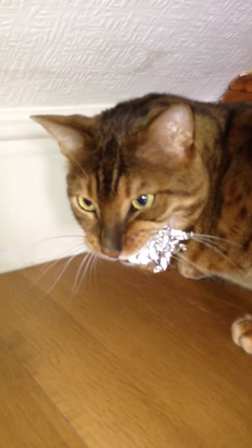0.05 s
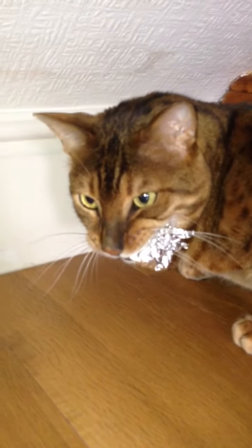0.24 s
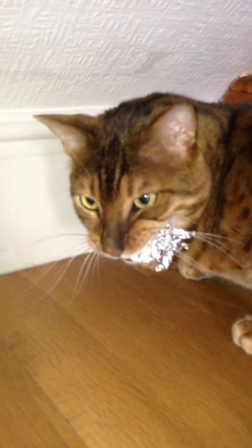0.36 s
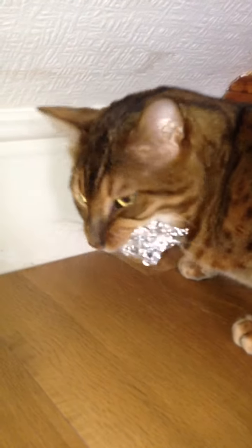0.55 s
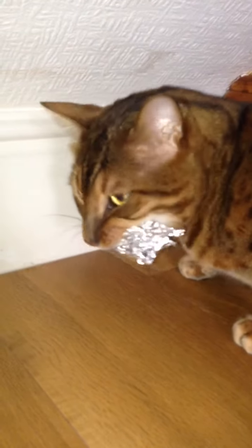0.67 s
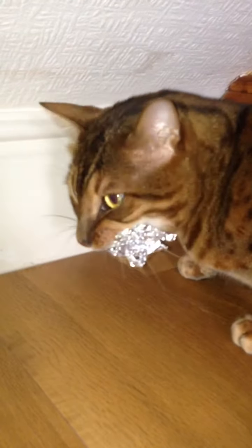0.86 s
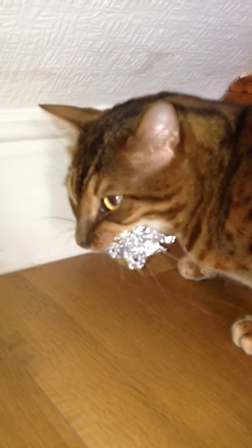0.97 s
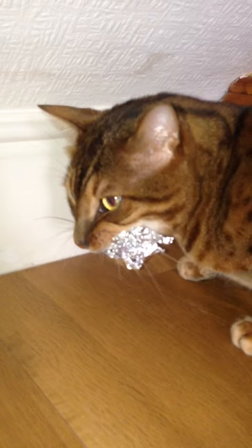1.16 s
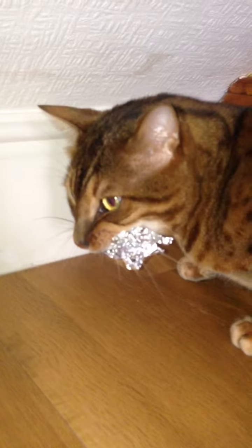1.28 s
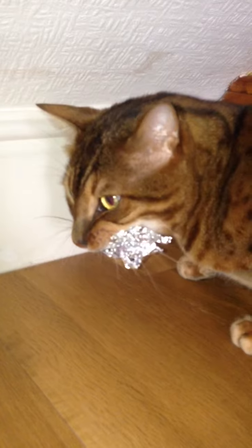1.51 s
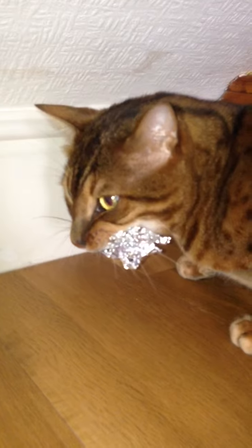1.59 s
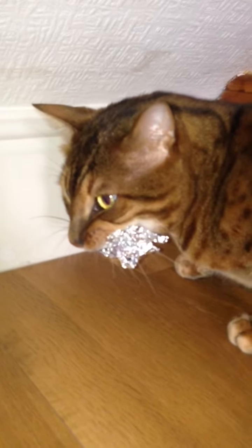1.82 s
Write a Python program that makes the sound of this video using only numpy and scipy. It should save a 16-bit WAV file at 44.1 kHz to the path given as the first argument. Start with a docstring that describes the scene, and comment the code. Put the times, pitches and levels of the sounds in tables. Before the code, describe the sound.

A cat growls through a shut mouth, close to the microphone. A soft gust of breath comes at about 0.2 seconds, and the low, rough growl starts right with it. It swells and rises slightly, loudest from 0.4 to 0.8 seconds, then sinks to a quieter, lower, throbbing rattle with faint nasal breath, lasting until about 1.85 seconds. The quiet room hisses faintly behind.

```python
"""A soft gust of breath, then a cat growls through its nose, close to the microphone in a quiet room.
Its mouth is shut on a ball of foil. Two parts of the larynx vibrate at different pitches, waver
together, and throb near a 4:7 ratio as the growl sinks from its swell to a low rattle.
Each cycle knocks the throat and lets a puff of air through the nose.
The nearby wall and floor answer briefly; the room hisses behind."""
import sys
import numpy as np
from scipy import signal
from scipy.fft import rfft, irfft, next_fast_len
from scipy.io import wavfile
from scipy.ndimage import map_coordinates

SR = 44100
rng = np.random.default_rng(int(sys.argv[2]) if len(sys.argv) > 2 else 0)


def output_pcm(signal):
    """Save a mono or channel-first signal as 16-bit PCM at the path in sys.argv[1].

    Samples are clipped to [-1, 1] before scaling.
    """
    pcm = np.clip(np.atleast_2d(signal).T, -1, 1) * 32767
    wavfile.write(sys.argv[1], SR, np.round(pcm).astype(np.int16))


N = 81585
JITTER, JITTER_HZ = .011, 55  # the larynx wavers: share of its pitch, changes a second


def amp(db):
    """Decibels to gain."""
    return 10 ** (np.asarray(db) / 20)


def unit(x):
    """x at rms 1."""
    return x / np.sqrt(np.mean(x ** 2) + 1e-20)


def curves(rows):
    """One value per sample for each column after the time."""
    time_s, *columns = np.transpose(rows)
    return [np.interp(np.arange(N) / SR, time_s, column) for column in columns]


def level(rows):
    """Gain per sample from rows of time_s, level_db."""
    return amp(curves(rows)[0])


def wobble():
    """A smooth random curve: the unsteadiness of the larynx."""
    return map_coordinates(rng.standard_normal(N), [np.arange(N) * JITTER_HZ / SR], order=3)


def filtered(x, response):
    """x times a complex response of frequency."""
    size = 2 * next_fast_len(N)
    return irfft(rfft(x, size) * response(np.fft.rfftfreq(size, 1 / SR)), size)[:N]


def coloured(x, spectrum):
    """x through a causal filter shaped by rows of freq_hz, gain_db, at rms 1."""
    freq_hz, gain_db = np.transpose(spectrum)

    def response(hz):
        gain = amp(np.interp(np.log(hz + 1), np.log(freq_hz), gain_db))
        cepstrum = irfft(np.log(gain))
        half = len(cepstrum) // 2
        cepstrum[1:half] *= 2  # fold to minimum phase
        cepstrum[half + 1:] = 0
        return np.exp(rfft(cepstrum))
    return unit(filtered(x, response))


def noise(spectrum):
    """Coloured noise at rms 1."""
    return coloured(rng.standard_normal(N), spectrum)


def resonant(x, peaks):
    """x through parallel resonances of alternating sign, at rms 1."""
    def response(hz):
        return sum((-1) ** k * amp(db) * 1j * hz * width / (centre ** 2 - hz ** 2 + 1j * hz * width)
                   for k, (centre, width, db) in enumerate(peaks))
    return unit(filtered(x, response))


# The quiet room behind the cat: freq_hz, gain_db
ROOM_SPECTRUM = [(25, -15), (50, -6), (95, 6), (200, 0.5), (400, -6.5), (700, -6.5), (1200, -7),
                 (2600, -6.5), (3500, -9), (8000, -11), (15000, -11)]


def room_hiss(level_db=-66):
    """The steady hiss of the room."""
    return amp(level_db) * noise(ROOM_SPECTRUM)


def corner(x, t60_s=0.11, level_db=-9):
    """x with the short, dense answer of wall and floor."""
    t = np.arange(SR // 4) / SR
    tail = rng.standard_normal(len(t)) * amp(-60 * t / t60_s)
    return x + amp(level_db) * signal.fftconvolve(x, tail / np.linalg.norm(tail))[:N]


# Breath close to the microphone: time_s, level_db
BREATH_LEVEL = [(.5, -76), (.9, -77.5), (1.2, -71.5), (1.35, -68), (1.6, -67), (1.72, -74), (1.85, -69)]
# Its colour: freq_hz, gain_db
BREATH_SPECTRUM = [(500, -16), (900, -14), (1500, 5), (2200, -3.5), (2900, -6.5), (4500, -3.5), (7000, -5),
                   (10000, -11.5), (15000, -19)]


def breath():
    """Air hisses from the nose, strongest as the growl sinks."""
    return level(BREATH_LEVEL) * noise(BREATH_SPECTRUM)


# The opening gust, close by: time_s, level_db
FIRST_GUST_LEVEL = [(.09, -97), (.2, -60.5), (.26, -62), (.36, -62), (.46, -73.5), (.7, -71), (.9, -97)]
# Its colour: freq_hz, gain_db
GUST_SPECTRUM = [(400, -12), (620, 4.5), (850, 7), (1500, 1.5), (2200, 2), (3200, -1.5), (4500, -2.5),
                 (7000, -5.5), (10000, -10), (15000, -24)]


def first_gust():
    """Air rushes through the nose just ahead of the voice and fades under it."""
    return level(FIRST_GUST_LEVEL) * noise(GUST_SPECTRUM)


# The nose at close range (rasp, bright ring, nostril sizzle, thin high edge): time_s, level_db
NOSE_RASP_LEVEL = [(.13, -111), (.23, -67.5), (.32, -68), (.4, -61.5), (.48, -63.5), (.54, -62),
                   (.62, -61.5), (.7, -64.5), (.76, -61.5), (.86, -64.5), (1.02, -67), (1.2, -66.5),
                   (1.5, -69), (1.85, -69)]
NOSE_RING_LEVEL = [(.15, -85), (.24, -67), (.29, -61.5), (.34, -67.5), (.39, -60), (.43, -60), (.51, -63),
                   (.58, -63), (.66, -67.5), (.8, -72), (1.1, -78), (1.85, -84)]
NOSTRIL_LEVEL = [(.2, -97), (.5, -78), (.6, -85), (.68, -72), (.85, -71.5), (1.05, -73), (1.5, -76),
                 (1.85, -74)]
HIGH_EDGE_LEVEL = [(.45, -95), (.57, -81), (.65, -79), (.78, -81), (1, -84), (1.3, -92)]
# Colour of the rasp: freq_hz, gain_db
RASP_SPECTRUM = [(300, -27), (550, -14.5), (640, -7.5), (780, -12.5), (920, -6.5), (1080, 1.5), (1220, -3),
                 (1500, -4.5), (1800, -22.5), (2230, -4), (2900, -24), (5000, -39.5), (12000, -31.5)]
# Resonances of ring, sizzle and edge: centre_hz, width_hz, gain_db
RING_PEAKS = [(2450, 205, 6), (2672, 210, -5)]
NOSTRIL_PEAKS = [(3330, 215, -4), (7000, 500, -18)]
EDGE_PEAKS = [(6000, 250, -2), (7400, 340, -5)]


def nose(pulses, puff_decay_s=0.0041, steady_leak=0.57, click_db=-12.5):
    """Each closure clicks and lets a puff of air through the nasal resonances."""
    puffs = unit(signal.lfilter([1], [1, -np.exp(-1 / (puff_decay_s * SR))], pulses))
    turbulence = unit((puffs + steady_leak) * rng.standard_normal(N))
    flow = turbulence + amp(click_db) * unit(pulses)
    rasp = level(NOSE_RASP_LEVEL) * coloured(flow, RASP_SPECTRUM)
    ring = level(NOSE_RING_LEVEL) * resonant(flow, RING_PEAKS)
    sizzle = level(NOSTRIL_LEVEL) * resonant(flow, NOSTRIL_PEAKS)
    edge = level(HIGH_EDGE_LEVEL) * resonant(flow, EDGE_PEAKS)
    return rasp + ring + sizzle + edge


def closures(own, other, scatter_db, scatter_s=.00042, pull_s=.0005, coupling=0.17):
    """One pulse per cycle of a vibration; chance and the other vibration vary its time and size."""
    starts = np.flatnonzero(np.diff(np.floor(own)))
    chance = rng.standard_normal((N // 100, 2))[:len(starts)]
    other_phase = 2 * np.pi * other[starts]
    when = starts + SR * (pull_s * np.sin(other_phase) + scatter_s * chance[:, 0])
    size = (1 + coupling * np.cos(other_phase)) * amp(scatter_db * chance[:, 1])
    return np.bincount(np.clip(when, 0, N - 1).astype(int), size, N)


# Knocks in the throat, behind the shut mouth: time_s, level_db
KNOCK_LEVEL = [(.17, -87), (.185, -57), (.222, -66), (.235, -52.5), (.275, -51.5), (.305, -58.5),
               (.345, -48.5), (.42, -50.5), (.5, -50), (.63, -45.5), (.75, -53), (.87, -55), (1.03, -62),
               (1.2, -63.5), (1.5, -65), (1.68, -61.5), (1.85, -58)]
# Colour of the throat: freq_hz, gain_db
THROAT_SPECTRUM = [(30, -27.5), (60, -13.5), (85, -34), (120, -14.5), (160, 0.5), (190, -5), (220, -5),
                   (255, -4), (295, -0.5), (350, -1.5), (400, -5.5), (470, -10.5), (540, -28), (640, -17),
                   (780, -30.5), (1100, -27.5), (1800, -45.5), (5000, -84)]


def throat(slow, fast, fast_db=-1.5, scatter_db=2.3):
    """The closures of both vibrations knock the throat."""
    pulses = closures(slow, fast, scatter_db) + amp(fast_db) * closures(fast, slow, scatter_db)
    return level(KNOCK_LEVEL) * coloured(pulses, THROAT_SPECTRUM)


# Low flutter in the growl: time_s, level_db
LOW_FLUTTER_LEVEL = [(.17, -90), (.187, -56), (.22, -56), (.235, -45), (.28, -49), (.31, -41), (.34, -51.5),
                     (.42, -54.5), (.66, -44), (.9, -50.5), (1.3, -51), (1.85, -60.5)]
# Its colour: freq_hz, gain_db
FLUTTER_SPECTRUM = [(25, -15.5), (55, -11.5), (78, -3.5), (140, 5), (200, -14), (350, -15.5), (470, -17),
                    (600, -43), (2000, -59.5)]


def flutter():
    """Low, irregular noise roughens the voice."""
    return level(LOW_FLUTTER_LEVEL) * noise(FLUTTER_SPECTRUM)


def hum(cycles, gain, start_s=0.226, attack_s=0.013, shimmer_db=-0.5):
    """A slightly unsteady tone that sets in with the growl."""
    attack = np.clip((np.arange(N) / SR - start_s) / attack_s, 0, 1)
    shimmer = amp(shimmer_db * wobble())
    return np.sqrt(2) * attack * gain * shimmer * np.cos(2 * np.pi * cycles)


# Second harmonic, upper harmonics and combination tones: time_s, level_db
OCTAVE_LEVEL = [(.22, -81), (.34, -55), (.4, -48), (.5, -50), (.62, -57), (.72, -49.5), (.81, -50.5),
                (.95, -68), (1.05, -49.5), (1.5, -66), (1.85, -67)]
UPPER_LEVEL = [(.22, -69), (.3, -67), (.42, -60.5), (.54, -62.5), (.6, -57.5), (.635, -50), (.68, -55),
               (.74, -65), (.85, -80), (1.85, -85.5)]
COMBINATION_LEVEL = [(.22, -66), (.5, -79), (.7, -88), (.9, -57), (1.1, -63.5), (1.4, -56.5), (1.85, -58)]
# Pitch of each combination tone: slow_multiple, fast_multiple
COMBINATIONS = [(-1, 2), (1, 1), (4, -1)]
# Weight of each: gain_db
COMBINATION_DB = [-2.5, -11, -0.5]


def overtones(slow, fast, fourth_db=-2.5):
    """Harmonics of the slow vibration, and the tones that the two make together."""
    tones = hum(2 * slow, level(OCTAVE_LEVEL))
    tones += hum(3 * slow, level(UPPER_LEVEL))
    tones += hum(4 * slow, amp(fourth_db) * level(UPPER_LEVEL))
    for (slow_multiple, fast_multiple), db in zip(COMBINATIONS, COMBINATION_DB):
        tones += hum(slow_multiple * slow + fast_multiple * fast, amp(db) * level(COMBINATION_LEVEL))
    return tones


def vibration(rows, shared_jitter):
    """One vibrating part of the larynx: its count of cycles and its hum."""
    pitch_hz, level_db = curves(rows)
    cycles = np.cumsum(pitch_hz * (1 + shared_jitter + JITTER * wobble())) / SR
    return cycles, hum(cycles, amp(level_db))


# The two vibrating parts of the larynx, heard close by: time_s, pitch_hz, level_db
SLOW_VOICE = [(0.22, 87.68, -49), (0.232, 84.47, -47.5), (0.296, 80.9, -45.5), (0.36, 91.2, -43.5),
              (0.424, 93.27, -34.5), (0.514, 89.44, -43.5), (0.636, 97.72, -31.5), (0.71, 101.4, -37),
              (0.768, 95.7, -36), (0.85, 84.34, -54), (1.09, 76.87, -48), (1.246, 73.05, -45),
              (1.5, 73.77, -45.5), (1.65, 72.18, -57), (1.78, 73.1, -50.5), (1.85, 75.1, -53.5)]
FAST_VOICE = [(0.22, 133.4, -68), (0.228, 130.7, -49), (0.238, 134.4, -38.5), (0.314, 139.5, -51.5),
              (0.338, 144.9, -74), (0.406, 153.9, -59), (0.554, 153.8, -38.5), (0.618, 145.1, -58),
              (0.66, 143.8, -41.5), (0.822, 146.5, -37.5), (0.918, 143.6, -37.5), (1.096, 134.5, -52.5),
              (1.35, 130.8, -49.5), (1.844, 128, -58), (1.85, 129.2, -58)]
# Throb as every fourth slow cycle comes stronger: time_s, depth_fraction
THROB_DEPTH = [(.22, 0.23), (.36, 0.02), (.95, 0.13), (1.04, 0.41), (1.2, .35), (1.5, 0.44), (1.62, 0.14),
               (1.85, .15)]


def growl(throb_cycles=4, low_hum_db=-.5):
    """The larynx hums low under a throbbing upper voice and drives the throat and nose."""
    shared_jitter = JITTER * wobble()
    slow, low_hum = vibration(SLOW_VOICE, shared_jitter)
    fast, high_hum = vibration(FAST_VOICE, shared_jitter)
    knocks = throat(slow, fast)
    throb = 1 + curves(THROB_DEPTH)[0] * np.cos(2 * np.pi * slow / throb_cycles)
    upper_voice = throb * (high_hum + overtones(slow, fast))
    voice = amp(low_hum_db) * low_hum + upper_voice + flutter()
    puffs = nose(closures(slow, fast, scatter_db=2.5))
    return voice + corner(throb * knocks + puffs)


def scene():
    """The cat's breath, the room and the growl, at one close microphone."""
    return (first_gust() + breath() + room_hiss() + growl())[None]


def record(dry, top_hz=15250):
    """The microphone keeps nothing above its band limit."""
    return filtered(dry[0], lambda hz: hz < top_hz)[None]


dry = scene()
out = record(dry)
output_pcm(out)
```